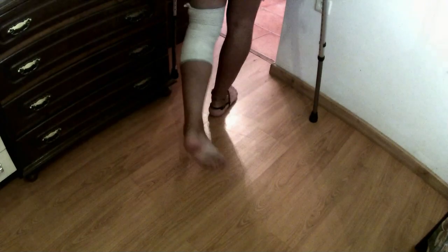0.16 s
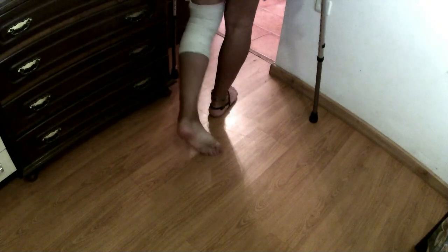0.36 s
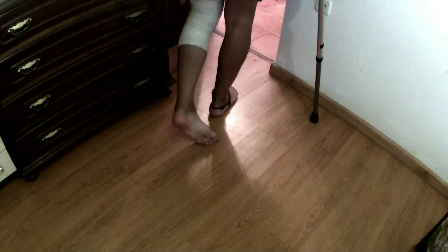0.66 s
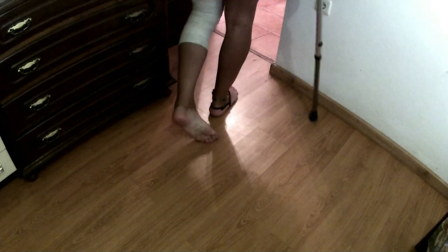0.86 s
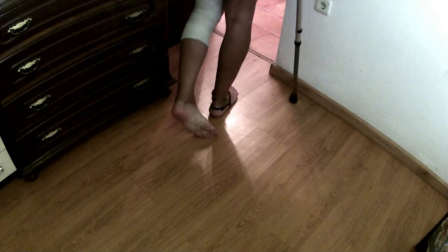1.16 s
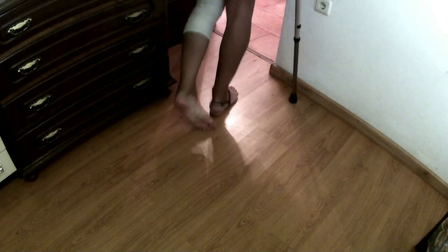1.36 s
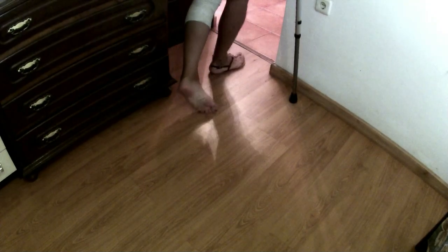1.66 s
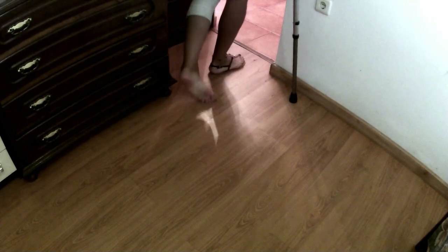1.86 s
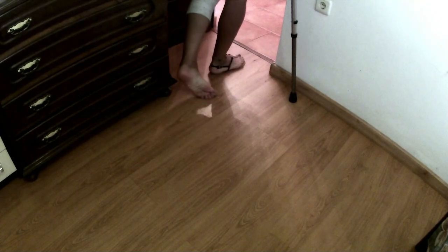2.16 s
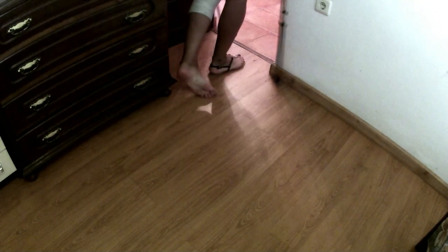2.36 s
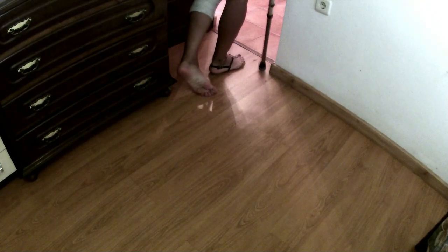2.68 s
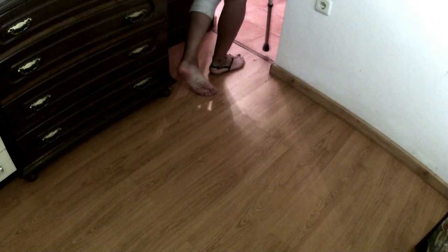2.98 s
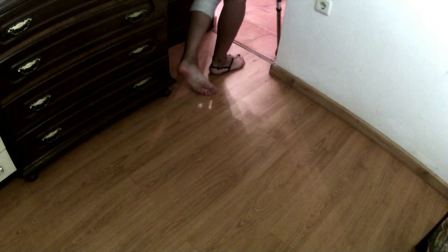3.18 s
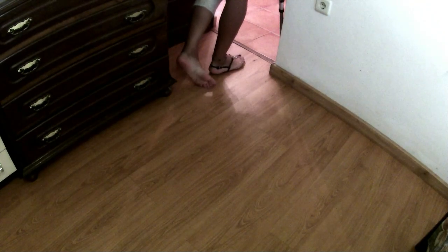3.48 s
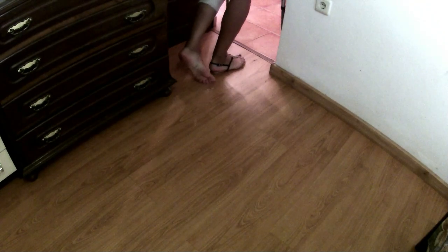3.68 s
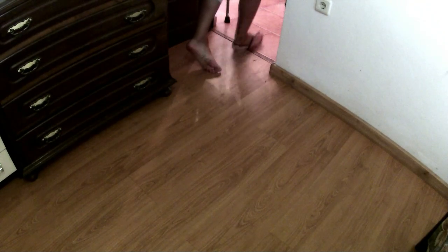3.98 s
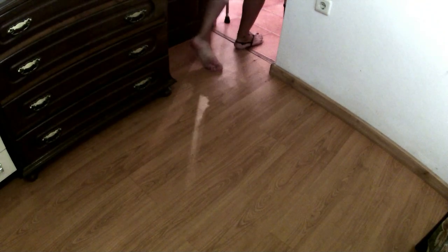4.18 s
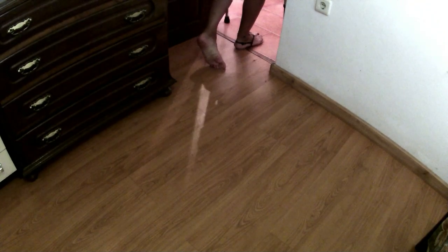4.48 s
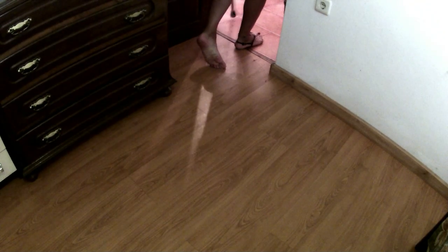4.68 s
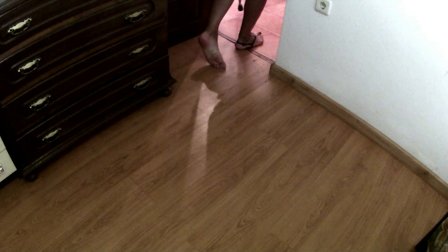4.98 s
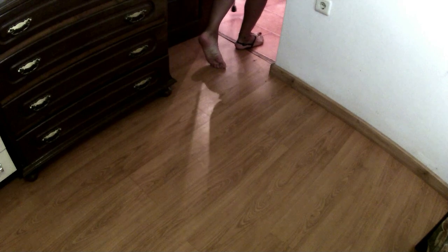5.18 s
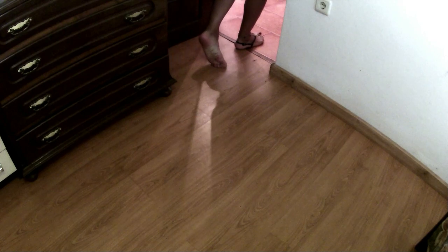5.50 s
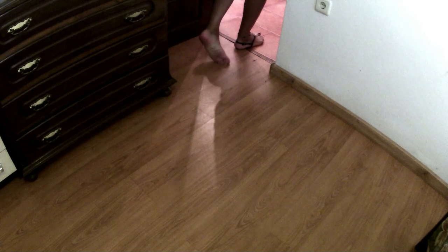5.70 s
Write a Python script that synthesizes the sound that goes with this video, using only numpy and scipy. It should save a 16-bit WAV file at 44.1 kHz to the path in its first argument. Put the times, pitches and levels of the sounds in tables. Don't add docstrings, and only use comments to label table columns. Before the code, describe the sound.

Slow walking on crutches indoors: loose metallic clacks, rubber tips thudding on laminate, gritty sandal scuffs and two boomy footfalls.

```python
import sys
import numpy as np
from scipy import signal
from scipy.fft import rfft, irfft, next_fast_len
from scipy.io import wavfile
from scipy.ndimage import map_coordinates

SR = 44100
rng = np.random.default_rng(int(sys.argv[2]) if len(sys.argv) > 2 else 0)


def to_linear_factor(level_db):
    exponent = np.asarray(level_db, float) / 20
    return 10 ** exponent


def transcribe(signal):
    frames = np.atleast_2d(signal).T
    limited = np.clip(frames, -1, 1)
    pcm = np.round(limited * 32767).astype(np.int16)
    wavfile.write(sys.argv[1], SR, pcm)


N = 257544


def crutch_tube():
    # t/s, level/dB (peak), f/Hz (centre), rattle length/s
    clacks = [(.117, -31.5, 3270, 0.025), (.199, -39.5, 3570, .01), (.247, -38.5, 3300, 0.019),
              (1.278, -41, 2780, 0.0033), (1.366, -33.5, 2900, 0.0033), (1.788, -36, 3930, 0.0035),
              (1.851, -37, 3400, 0.0058), (2.144, -49, 3400, .0027), (2.376, -56, 2840, 0.0085),
              (2.657, -36.5, 2700, 0.0023), (3.142, -46.5, 3120, .0043), (4.003, -34, 2520, 0.0053),
              (4.226, -36, 2900, 0.0068), (4.257, -36.5, 3550, .0039), (4.339, -41, 3400, 0.0043),
              (5.093, -34.5, 2330, 0.0083), (5.093, -39, 4120, .0025), (5.335, -37.5, 3000, 0.0054),
              (5.381, -41, 3100, .0054), (4.713, -54.5, 3300, .005), (5.428, -46, 3500, 0.0052)]
    # t/s, level/dB (peak), f/Hz (centre), rattle length/s
    bottoms = [
        (0.324, -25, 3300, 0.0064),
        (1.699, -35, 3176, 0.017),
        (3.915, -35, 3290, 0.005),
    ]
    # t/s, level/dB (peak), f/Hz (centre), rattle length/s
    ticks = [
        (1.282, -36, 2800, 0.0033),
        (1.562, -40.5, 3860, .0035),
        (2.387, -38.5, 3230, .0028),
        (2.412, -55, 3300, .002),
        (3.127, -43.5, 3300, .004),
        (4.205, -43, 4300, 0.003),
        (4.244, -33.5, 3380, 0.0012),
        (4.753, -52, 3480, .0024),
        (5.755, -50, 4270, 0.0024),
    ]
    rebound_s, rebound_db, rebound_length_s = 0.025, -7, 0.0052
    rebounds = [(s + rebound_s, db + rebound_db, hz, rebound_length_s) for s, db, hz, _ in bottoms]
    # rows, spread as share of centre at a 4 ms contact, level/dB of the bright ring near the pin
    kinds = [(clacks + rebounds, 0.55, -16.5), (bottoms, 0.4, -16.5), (ticks, 0.4, 1.5)]
    out = np.zeros(N)
    for rows, usual_spread, edge_db in kinds:
        for s, db, hz, length in rows:
            spread = usual_spread * (max(length, 0.0005) / 0.004) ** -0.3
            wet_db = 3.78 + 6 * np.log10(np.clip(length, 0.0005, 0.004) / 0.00567)
            wet_db -= 180 * max(length - 0.008, 0)
            colour = tube_colour(hz, spread, edge_db, snaps=length < 0.0032)
            add(out, s, to_linear_factor(db + 5) * blow(colour, length, wet_db))
    return out


def tube_colour(hz, spread, edge_db, snaps):
    # f/Hz, width/Hz, level/dB
    tube_modes = [(2156, 87, -0.5), (2620, 33, -0.5), (2900, 38, -2), (3100, 48, -8), (3300, 88, -2),
                  (3675, 53, 2), (3990, 50, -2), (4530, 260, -6), (5400, 88, -31)]
    body, edge, snap = band(hz, spread), band(5800, 0.12), band(8400, 0.2)
    modes = resonances(tube_modes)

    def response(f):
        contact = body(f) - to_linear_factor(edge_db) * edge(f) + to_linear_factor(-14) * snaps * snap(f)
        return contact * (1 + abs(modes(f)))

    return response


def floor_knocks():
    # t/s, level/dB (peak), f/Hz (centre), spread/share of centre
    thuds = [(.246, -42, 550, 0.6), (.329, -30.5, 333, 1.2), (1.28, -53.5, 300, 1.3),
             (1.367, -51.5, 820, 0.99), (1.79, -63, 630, .8), (1.853, -49, 476, .3),
             (3.915, -40, 638, 0.24), (3.942, -51, 716, 0.43), (4.007, -50, 930, .6),
             (4.204, -43, 627, .77), (4.337, -34.5, 415, 0.68), (5.092, -45.5, 520, 0.35),
             (5.335, -41.5, 407, 0.89)]
    # t/s, level/dB (peak), contact length/s
    slaps = [
        (.245, -43, 0.0073),
        (.325, -32.5, 0.0074),
        (1.79, -48, .02),
        (1.851, -44, 0.022),
        (2.657, -51, 0.0025),
        (3.128, -50, .0052),
        (4.215, -39, .025),
        (4.34, -43, 0.025),
        (5.102, -41.5, .01),
        (5.338, -35.5, 0.0075),
    ]
    thud_s, skin_hz, skin_spread = 0.0078, 1587, 0.53
    knocks = [(*row, thud_s) for row in thuds]
    knocks += [(s, db, skin_hz, skin_spread, length) for s, db, length in slaps]
    out = np.zeros(N)
    for s, db, hz, spread, length in knocks:
        add(out, s, to_linear_factor(db - 2) * blow(band(hz, spread), length, wet_db=5))
    return out


def sandal():
    # start t/s, end t/s, weight starts to come t/s
    slides = [
        (0, 0.318, 0.12),
        (1.53, 2.28, 1.63),
        (3.3, 3.931, 3.25),
        (4.03, 4.341, 4.04),
        (5.598, 5.87, 5.4),
    ]
    # peak t/s, level/dB, rise/s per 20 dB, fall/s per 20 dB, body level/dB
    strokes = [(0, -50.5, 2, 12, -8.5), (.128, -38, 0.12, 0.2, -17), (.26, -38, 0.15, -1.5, -10),
               (1.568, -50.5, .053, 1.5, -20), (1.69, -46, .22, .1, -14), (1.725, -39, 0.16, -0.1, -18),
               (1.795, -42, .015, 0.47, -11.5), (1.864, -37, .2, 0.04, -14), (1.954, -50, .05, 0.6, -9.5),
               (3.518, -55, 0.2, 3, -9), (3.918, -45.5, 0.09, .45, -17), (4.081, -40, .12, .13, -19),
               (4.245, -41, 0.1, 0.5, -10), (5.758, -61, -0.6, .033, -9), (5.822, -63, -0.8, .4, -9)]
    # f/Hz, width/Hz, level/dB
    sole_modes = [(2080, 2700, -4), (3400, 1520, 1), (4950, 1400, -0.5)]
    # f/Hz, width/Hz, level/dB
    sole_body = [
        (830, 770, 5.5),
        (550, 430, -9),
    ]
    press_s, firmest, lift_s = 0.32, 0.62, 0.016
    peak, db, rise, fall, body_db = np.transpose(strokes)[..., None]
    out = np.zeros(N)
    for start, end, weight in slides:
        t = start + np.arange(round((end - start) * SR)) / SR
        push = to_linear_factor(db - 20 * np.maximum((peak - t) / abs(rise), (t - peak) / abs(fall)))
        push = push * (peak >= start - 0.03) * (peak <= end)

        clumps = map_coordinates(rng.standard_normal(200), [np.minimum((t - start) * 60, 198)])
        grains = to_linear_factor(1.6 * clumps + 4.5 * rng.standard_normal(len(t)))
        grit = rng.standard_normal((2, len(t))) * grains

        bright = filtered(grit[0], resonances(sole_modes))
        bright = unit(filtered(bright, resonances([(3300, 1500, 0)])))
        light, pressed = [unit(filtered(grit[1], band(hz, width / hz))) * to_linear_factor(level_db)
                          for hz, width, level_db in sole_body]
        share = firmest * np.clip((t - weight) / press_s, 0, 1)
        dull = ((1 - share) * light + share * pressed) * (push * to_linear_factor(body_db)).max(axis=0)

        lift = np.clip((end - t) / lift_s, 0, 1)
        slide = lift * to_linear_factor(-6.5) * (bright * push.max(axis=0) + dull)
        add(out, start, room(slide, wet_db=-6.0, gap_s=0.0017))
    return out


def panels():
    # t/s, level/dB (peak), build-up/s, free ringing/s, damping level/dB
    landings = [
        (0.332, -33, 0.0065, 0.077, -3),
        (4.338, -29, 0.0053, 0.108, -3.5),
    ]
    # f/Hz, level/dB, t60/s
    panel_modes = [
        [(174.5, -0.5, 0.45), (300, 0, 0.53), (416, 2, 0.31), (417, 0, 0.34), (490, -23.5, 0.52), (551, -9, 1),
         (670, -8, 1), (741.4, -9, 0.44), (870, -1.5, 0.34)],
        [(185.8, 1.5, 0.39), (213.3, -7.5, 0.62), (300, -0.5, 0.67), (390, -12, 0.3), (437, -2, 0.39),
         (500.6, 4.5, 0.37), (509, 0, 0.53), (689, -8, 0.434), (746, -9, 0.41)],
    ]
    out, t = np.zeros(N), np.arange(SR) / SR
    for (s, db, rise, free, damp_db), modes in zip(landings, panel_modes):
        settle = to_linear_factor(damp_db * np.clip((t - free) / 0.006, 0, 1))
        boom = room(ring(modes, rise), wet_db=-15, gap_s=0.014)[:SR]
        add(out, s, to_linear_factor(db - 15.0) * settle * boom)
    return out


def joists():
    # t/s, level/dB, f/Hz, t60/s, build-up/s
    joist_modes = [
        (0.329, -54, 62, .95, 0.024),
        (0.332, -54, 74, 0.59, .03),
        (0.329, -54, 90.1, 0.7, 0.03),
        (0.331, -54, 125, 0.55, 0.017),
        (.33, -43, 185.7, 0.38, 0.031),
        (1.281, -66, 146, 0.27, 0.0084),
        (4.01, -66.5, 88, 0.7, 0.033),
        (5.1, -66.5, 88.6, 0.55, 0.023),
        (5.34, -63.5, 112, 0.31, 0.015),
        (5.4, -64, 240, 0.5, 0.023),
    ]
    out = np.zeros(N)
    for s, db, hz, t60, rise in joist_modes:
        add(out, s, ring([(hz, db, t60)], rise))
    return out


def blow(colour, length, wet_db):
    u = np.arange(4096) / SR / max(length, 0.0005)
    contacts = rng.standard_normal(len(u)) * to_linear_factor(2.0 * rng.standard_normal(len(u)))
    direct = filtered(contacts * np.tanh(8 * u) * np.exp(-u ** 3), colour)
    direct = direct / abs(direct).max()
    wet = filtered(echoes(gap_s=0.007), colour)
    wet = wet * to_linear_factor(wet_db) * np.linalg.norm(direct) / np.linalg.norm(wet)
    return wet + np.pad(direct, (0, len(wet) - len(u)))


def ring(modes, rise_s):
    t = np.arange(SR) / SR
    tones = sum(to_linear_factor(db - 60 * t / t60) * np.sin(2 * np.pi * (hz * t + rng.random()))
                for hz, db, t60 in modes)
    return tones * (1 - np.exp(-t / max(rise_s, 1e-4)))


def resonances(peaks):
    def response(f):
        return sum((-1) ** k * to_linear_factor(db) * 1j * f * width / (hz * hz - f * f + 1j * f * width)
                   for k, (hz, width, db) in enumerate(peaks))

    return response


def band(hz, spread):
    once = resonances([(hz, 1.5 * hz * max(spread, 0.05), 0)])
    return lambda f: once(f) ** 2


def room(x, wet_db, gap_s):
    wet = to_linear_factor(wet_db) * signal.fftconvolve(x, echoes(gap_s))
    return wet + np.pad(x, (0, len(wet) - len(x)))


def echoes(gap_s):
    # f/Hz, t60/s
    walls = [(100, 1), (400, 0.44), (1500, 0.49), (3500, 0.33), (7000, 0.37)]
    # f/Hz, t60/s
    hall = [(100, 1.4), (600, 1.55), (1500, 1.03), (4500, 2), (8000, 2.5)]
    hz, t, z = signal.stft(rng.standard_normal(SR * 3 // 4), SR, nperseg=256)
    near, far = along(walls, hz)[:, None], along(hall, hz)[:, None]
    decay = to_linear_factor(-60 * t / near) + to_linear_factor(-60 * t / far - 18)
    tail = signal.istft(z * decay, SR, nperseg=256)[1]
    t = np.arange(len(tail)) / SR
    lumps = map_coordinates(rng.standard_normal(300), [t * 220]) * np.exp(-t / 0.0179)
    tail = tail * to_linear_factor(4.2 * lumps) * (1 - np.exp(-(t / gap_s) ** 2))
    return tail / np.linalg.norm(tail)


def unit(x):
    return x / np.sqrt(np.mean(x ** 2) + 1e-20)


def along(points, hz):
    f, v = np.transpose(points)
    return np.interp(np.log(hz + 1), np.log(f + 1), v)


def filtered(x, response):
    m = next_fast_len(len(x) + 8192)
    return irfft(rfft(x, m) * response(np.fft.rfftfreq(m, 1 / SR)), m)[:len(x)]


def add(track, s, x):
    part = track[round(s * SR):][:len(x)]
    part += x[:len(part)]


def microphone(x):
    # f/Hz, level/dB
    capsule = [(30, -47), (70, 13.5), (5500, -0.5), (6500, 0.5), (7500, -3.5), (10000, -12), (16000, -47)]
    return filtered(x, lambda hz: to_linear_factor(along(capsule, hz)))


def steady(spectrum, db):
    return to_linear_factor(db) * unit(filtered(rng.standard_normal(N), lambda hz: to_linear_factor(along(spectrum, hz))))


def murmur():
    # f/Hz, level/dB per Hz
    murmur_levels = [(30, -15.5), (120, -7.5), (300, -7.5), (700, -10.5), (1500, -13.5), (3300, -16.5),
                     (10000, -24), (16000, -26)]
    return steady(murmur_levels, db=-58.5)


def hiss():
    # f/Hz, level/dB per Hz
    hiss_levels = [(30, -11), (100, -1.5), (700, 8), (2000, -6.5), (4000, -5), (7000, 8), (11000, 8.5),
                   (16000, 5)]
    return steady(hiss_levels, db=-71.5) * [[1], [-1]]


def scene():
    near = microphone(crutch_tube() + floor_knocks() + sandal() + panels() + joists())
    mono = near + murmur()
    return np.array([mono, mono])


def band_limit(x):
    return signal.sosfilt(signal.butter(12, 15650, fs=SR, output="sos"), x)


def record(dry):
    wired = dry + hiss()
    limited = np.array([filtered(side, lambda hz: hz < 15300) for side in wired])
    return band_limit(limited)


dry = scene()
out = record(dry)
transcribe(out)
```